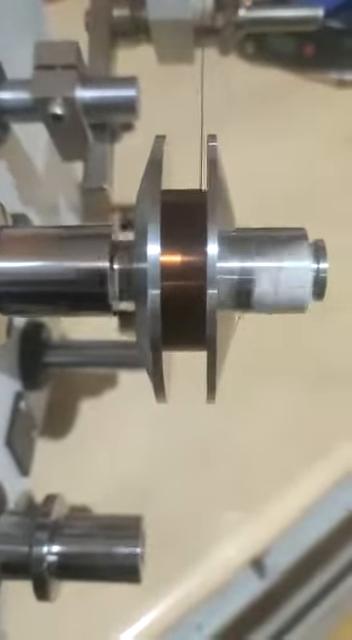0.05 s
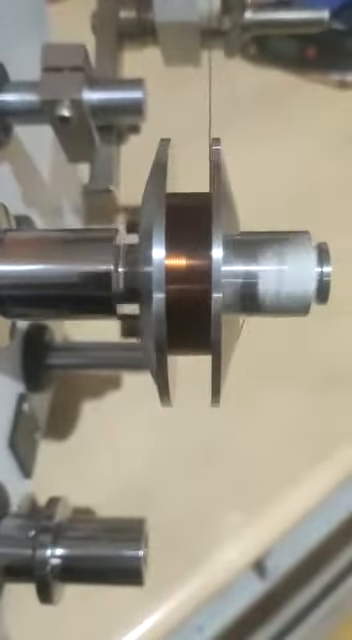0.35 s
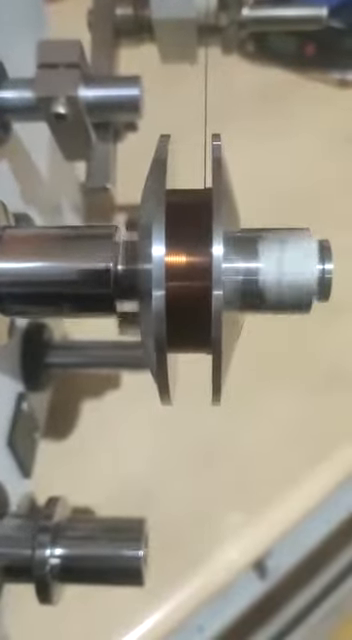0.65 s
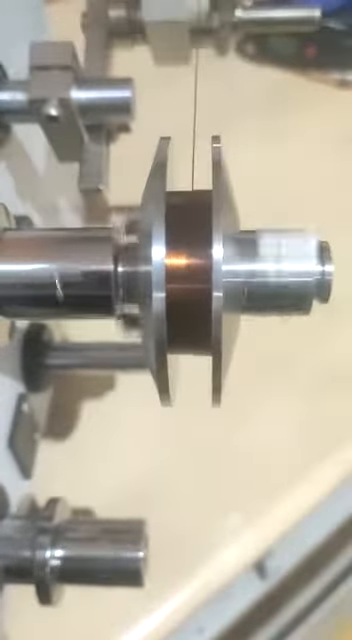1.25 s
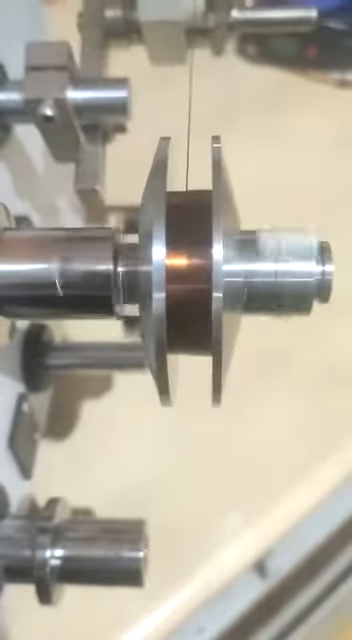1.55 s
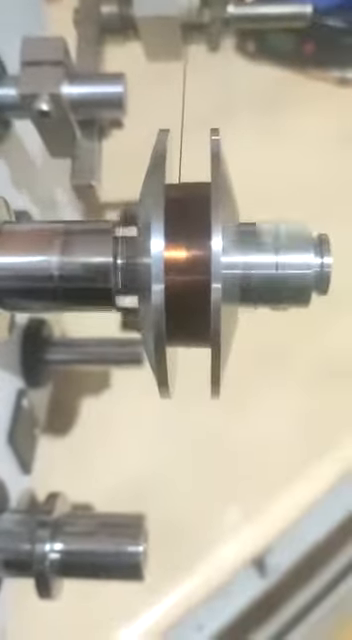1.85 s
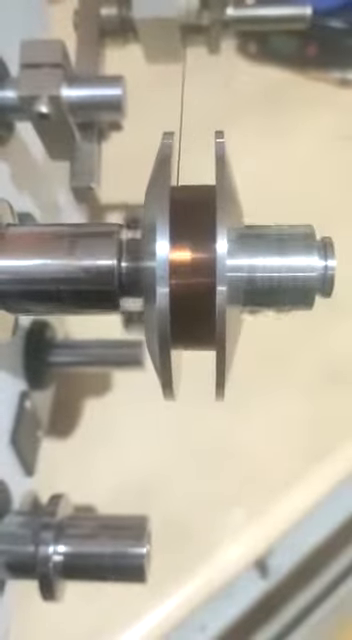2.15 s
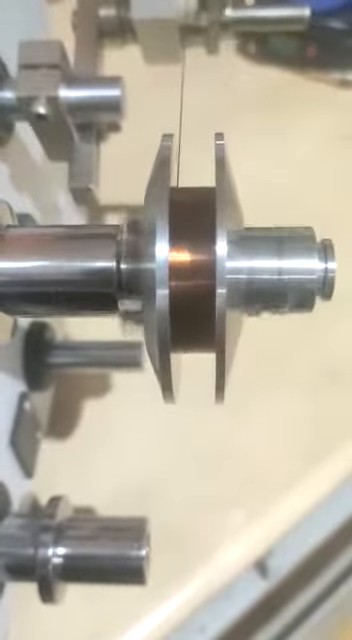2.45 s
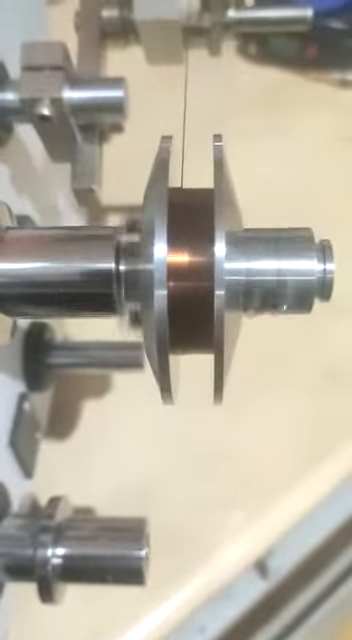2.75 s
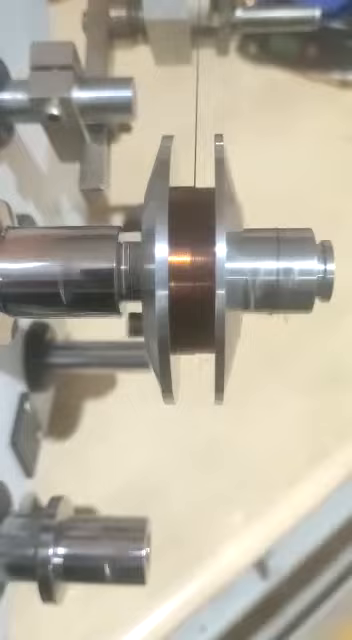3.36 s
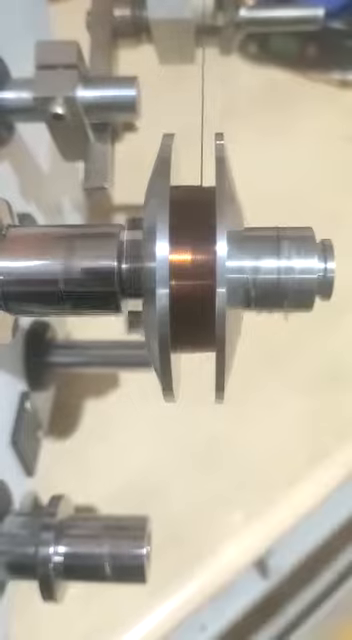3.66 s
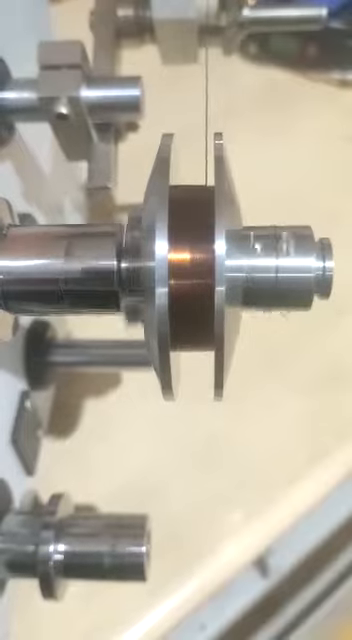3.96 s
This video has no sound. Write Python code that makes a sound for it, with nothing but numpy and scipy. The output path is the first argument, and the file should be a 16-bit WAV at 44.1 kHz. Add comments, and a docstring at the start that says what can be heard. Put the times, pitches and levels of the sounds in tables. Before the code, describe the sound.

A coil winding machine runs close by for the whole four seconds, its drive rattling with quick, uneven, lightly ringing knocks. A thin motor whine, low rumble, fine hiss and steady workshop rush go with it. At about 0.4 seconds the wire gives one tiny scrape. From around 1.2 to 2.8 seconds the whine slowly shifts in tone, while the speed stays almost constant.

```python
"""A coil winder runs close to the microphone, winding wire on a bobbin. From the start, play
(looseness) in the drive rattles and knocks the housing. The motor whines at multiples of its turning
rate, its power supply adds thin steady tones, the frame rumbles, and wire and motor hiss.
At about 0.4 s the wire scrapes once. From 1.2 s the whine slowly changes colour.
Near 3 s the motor speeds up a tiny bit, then settles a little slower."""
import sys
import numpy as np
from scipy import signal
from scipy.fft import rfft, irfft
from scipy.io import wavfile

SR = 44100
rng = np.random.default_rng(int(sys.argv[2]) if len(sys.argv) > 2 else 0)


def dump(signal):
    """Clip the signal to [-1, 1] and save it as 16-bit WAV at the path in sys.argv[1]."""
    limited = np.clip(np.atleast_2d(signal).T, -1, 1)
    pcm = np.round(limited * 32767).astype(np.int16)
    wavfile.write(sys.argv[1], SR, pcm)


N = 176400
T = np.arange(N) / SR
FREQ = np.maximum(np.arange(N // 2 + 1) * SR / N, 1)

# knocks of the drive (time [s], low ring [relative dB], bright ring [relative dB])
DRIVE_KNOCKS = [(0.157, -18.5, -35), (0.207, -32, -27), (0.287, -28, -61), (0.351, -25.5, -45),
                (0.421, -25, -29), (0.484, -21.5, -27), (0.546, -27, -44), (0.703, -26.5, -46),
                (0.764, -37, -31.5), (0.835, -24.5, -33), (0.892, -30, -27.5), (0.968, -27, -35),
                (1.025, -46, -40), (1.101, -27, -26.5), (1.15, -28, -53), (1.229, -26.5, -28.5),
                (1.289, -39, -26.5), (1.375, -22, -37), (1.425, -25, -30), (1.499, -34, -25),
                (1.554, -33, -29), (1.654, -27, -28), (1.747, -28.5, -31), (1.8, -39, -29),
                (1.866, -29.5, -30), (1.927, -28, -28), (2.06, -45, -28), (2.119, -30, -27),
                (2.18, -39, -29), (2.244, -23.5, -26.5), (2.304, -29, -29), (2.383, -24.5, -34),
                (2.435, -43, -27), (2.492, -23.5, -26.5), (2.549, -20, -34.5), (2.629, -22, -31),
                (2.737, -41, -26.5), (2.869, -45, -28.5), (2.935, -52, -30.5), (3.012, -34, -32),
                (3.066, -44, -28.5), (3.144, -25, -41), (3.228, -23.5, -41), (3.345, -22.5, -34),
                (3.393, -37, -25.5), (3.451, -37, -37), (3.522, -24.5, -31.5), (3.579, -29, -28),
                (3.639, -29, -37), (3.707, -40, -34), (3.77, -23.5, -26.5), (3.829, -41, -29),
                (3.891, -37, -29.5), (3.956, -31, -29)]
# notes the housing rings at
# (pitch [Hz], width [Hz], left [relative dB], right [relative dB], change in a hard knock [dB])
HOUSING_NOTES = [(660, 42.3, -8.5, -9.5, -9.5), (814, 34, -32, -16.5, -3), (887.2, 15.3, 5, -2, -3.5),
                 (912, 14.6, 2.5, 1.5, -2), (1018.5, 30, -2, -11.5, -6), (1024.4, 31.8, -3.5, 0.5, 0.5),
                 (1099.4, 18.7, -2, -2.5, 1), (1155, 13.4, -3.5, -3.5, 5.5), (1194.6, 70, -17.5, -15, 13.5),
                 (1267, 35, -29.5, -24, 17), (1346, 44, -21, -18.5, 8.5), (1528, 13.5, -35.5, -15.5, -6)]
# moments when the chatter dips briefly (time [s])
LULL_TIMES = [.265, 0.329, 0.403, 0.679, .94, 1.08, 1.342, 1.477, 2.8, 3.11]
# how fast the motor turns (time [s], speed [turns per s])
MOTOR_SPEED = [(1.9, 50.2), (2.88, 50.25), (2.97, 50.36), (3.14, 50.05)]
# tones of the whine (pitch [cycles per motor turn])
WHINE_MULTIPLES = (39, 54, 72, 90, 108, 139, 144, 146, 155, 162, 163, 167, 180, 191, 202, 214, 224, 227,
                   229, 230, 234, 238, 242)
# strength of each whine tone (early level [dB], late level [dB], left minus right [dB])
WHINE_LEVELS = [(-68, -69, -18), (-57, -50, 5), (-56, -60, -4.5), (-85, -73.5, 13), (-70.5, -69.5, 12.5),
                (-69, -66, 10), (-62.5, -64.5, -2), (-77, -75, -17), (-75, -73, -16), (-63, -58, -5),
                (-66.5, -65, -18), (-85, -79, -10), (-72, -67.5, -8), (-69.5, -70, -17), (-68, -63, -4),
                (-73, -67, -7), (-71, -71, 4), (-70, -71, 10), (-61, -60.5, -9), (-59, -65, -1),
                (-64, -63, -9), (-80, -78, -3), (-79, -67, 5)]
# mains hum and tones of the power supply (pitch [Hz])
SUPPLY_PITCHES = (100, 200, 2001, 3002, 4003, 8005, 10008)
# strength of each supply tone (level [dB], left minus right [dB])
SUPPLY_LEVELS = [(-55, 3), (-57.5, 1), (-78, -14), (-68, -7.5), (-62.5, -4), (-70, -18), (-74, 5)]
# notes the frame shakes at (pitch [Hz], width [Hz], level [relative dB])
FRAME_NOTES = [(26.3, 23, -10.5), (47.5, 21, -1), (71.3, 4.1, 1), (88.4, 8.8, -10), (128.9, 20.3, 1),
               (162, 33, -3), (192.3, 16.8, -2), (216, 28, -5), (242, 10.2, -5), (270.2, 11.3, -4.5),
               (302.4, 24, -9.5), (328, 11, -8.5)]
# bass swells, which rumble() scales down (time [s], deep bass [relative dB], bass [relative dB])
BASS_SWELLS = [(0.0, -47, -39.5), (0.09, -41, -43.5), (0.3, -46, -46.5), (0.47, -47, -41),
               (0.85, -54.5, -45.5), (1.7, -42, -42), (1.751, -31.5, -49), (1.94, -52, -43),
               (2.13, -55, -42), (2.25, -48, -47.5), (2.43, -50, -36.5), (2.5, -45, -43.5),
               (2.68, -51, -41), (2.901, -52, -42.5), (3.77, -41.5, -44.5), (3.82, -42, -41),
               (3.91, -44, -41.5), (4.0, -57, -40.5)]
# colour of the wire and motor hiss (frequency [Hz], level [relative dB])
HISS_COLOUR = [(1000, 10), (2000, 3), (2800, 0.5), (4200, 6.5), (6500, 1), (7100, 5.5), (8200, 5),
               (9200, 1), (9700, 7), (10500, 2.5), (11100, 10), (11450, 10), (11900, 10), (12200, 6),
               (12700, 1), (15000, -2.5), (16000, -14)]
# colour of the workshop air and bearing noise (frequency [Hz], level [relative dB])
AIR_COLOUR = [(15, 4), (28, 4), (100, -6.5), (250, -12), (370, -4), (450, -4), (560, -1.5), (750, 0),
              (950, 4.5), (1250, -8), (1450, -15.5), (2000, -16), (3000, -13.5), (5000, -27.5), (8000, -22),
              (16000, -45)]
# the microphone's two sides (frequency [Hz], left ahead by [radians], shared sound [0 to 1])
MIC_SIDES = [(30, 0.5, 1), (216, 0, 0.96), (320, 0, 0.82), (660, 0, 0.38), (1134, -1, 0.85),
             (1870, -2, 0.44), (2670, -2, 0.89), (4150, -2.5, 0.31), (8000, -1.5, 0.34),
             (11500, -1.34, 0.52), (16000, -1.5, .4)]

SPINDLE_HZ, THROB_DB, THROB_PEAK_S = 15.75, 0.2, 0.022
TAPS_PER_S, BOUNCES_PER_S, BOUNCE_FADE_S = 480, 380, 0.024
BRIGHT_ABOVE_HZ, CLACK_HZ, CLACK_WIDTH_HZ = 1065, 1106, 365
WHINE_CHANGE_S = (1.2, 2.83)  # from the early levels to the late ones
WOBBLES_PER_TURN, WOBBLE_BELOW_HZ, WOBBLE_DEPTH, WOBBLE_RADIANS = 0.6334, 3200, 0.34, 0.94


def chatter(lull_db=-8, lull_width_s=0.018):
    """All the noise of the loose drive: rattle and knocks with short lulls, plus dry clacks."""
    lulls = sum(np.exp(-((T - at) / lull_width_s) ** 2) for at in LULL_TIMES)
    return (rattle() + knocks()) * undb(lull_db * lulls) + clacks()


def rattle():
    """Loose parts tap the housing lightly, with a faint throb once a spindle turn."""
    taps = random_taps(TAPS_PER_S) * undb(rng.standard_normal(N))
    throb = undb(THROB_DB * np.cos(2 * np.pi * SPINDLE_HZ * (T - THROB_PEAK_S)))
    return level(housing(taps, np.array(HOUSING_NOTES), hardness=0) * throb, db=-37.5)


def knocks():
    """Loose parts hit, then bounce ever more weakly; each knock has its own low and bright ring."""
    times, low_db, bright_db = np.array(DRIVE_KNOCKS).T
    starts = (times * SR).astype(int)
    latest = np.maximum(np.searchsorted(starts, np.arange(N), side="right") - 1, 0)
    age = T - times[latest]  # seconds since the latest knock
    force = 0.5 * random_taps(BOUNCES_PER_S) * fade(age, BOUNCE_FADE_S)
    force[starts] = 0.9  # the first blow of each knock
    notes = np.array(HOUSING_NOTES)
    is_bright = notes[:, 0] > BRIGHT_ABOVE_HZ
    low = housing(force * undb(low_db[latest]), notes[~is_bright], hardness=0.75)
    bright = housing(force * undb(bright_db[latest]), notes[is_bright], hardness=1)
    return level(low, db=-40.5) + level(bright, db=-40.5)


def clacks():
    """Each knock also reaches the microphone directly, as a short dry clack."""
    times, _, bright_db = np.array(DRIVE_KNOCKS).T
    blows = np.zeros(N)
    blows[(times * SR).astype(int)] = undb(bright_db + 1)
    treble_cut = np.sqrt(1 + (FREQ / (CLACK_HZ + CLACK_WIDTH_HZ)) ** 20)
    response = ring(resonances([CLACK_HZ], [CLACK_WIDTH_HZ], [0]) / treble_cut)
    peak = abs(irfft(response, N)).max()
    return irfft(rfft(blows) * response * np.exp(1j * left_lead(FREQ)), N) / peak


def housing(force, notes, hardness):
    """The housing rings when it is hit; hard blows favour its higher notes."""
    hz, width, left_db, right_db, hard_db = notes.T
    response = [ring(resonances(hz, width, db + hardness * hard_db)) for db in (left_db, right_db)]
    scattered = force * rng.choice([-1, 1], (2, N))
    return microphone(force, scattered, np.array(response))


def whine():
    """The motor sings at multiples of its turning rate; the load makes the lowest tones wobble."""
    angle = 2 * np.pi * motor_turns()
    load = WOBBLES_PER_TURN * angle  # about twice a spindle turn
    out = 0
    for multiple, (early_db, late_db, pan_db) in zip(WHINE_MULTIPLES, WHINE_LEVELS):
        hz = multiple * MOTOR_SPEED[0][1]
        flicker_db = 1.98 * wander(rate_hz=10.7)
        gain = undb(np.interp(T, WHINE_CHANGE_S, [early_db, late_db]) + flicker_db)
        phase = multiple * angle
        rough_db, jitter = 2.7 * wander(rate_hz=90), 0.35 * wander(rate_hz=200)
        if hz < WOBBLE_BELOW_HZ:
            gain *= undb(rough_db) * (1 + WOBBLE_DEPTH * np.cos(load))
            phase += WOBBLE_RADIANS * np.sin(load) + jitter
        out += gain * tone(phase, hz, pan_db)
    return out


def motor_turns():
    """Add up the motor's speed to count its turns so far."""
    times, speed = np.array(MOTOR_SPEED).T
    return np.cumsum(np.interp(T, times, speed)) / SR


def power_supply():
    """The electricity adds a low hum and thin, steady tones."""
    return sum(undb(db) * tone(2 * np.pi * hz * T, hz, pan_db)
               for hz, (db, pan_db) in zip(SUPPLY_PITCHES, SUPPLY_LEVELS))


def rumble(deep_below_hz=93):
    """The frame shakes; its deep bass and its bass swell and sink separately."""
    times, deep_db, bass_db = np.array(BASS_SWELLS).T
    colour = resonances(*np.array(FRAME_NOTES).T)
    deep_share = 1 / (1 + (FREQ / deep_below_hz) ** 8)
    out = 0
    for share, db, depth in ((deep_share, deep_db, 0.6), (1 - deep_share, bass_db, 0.81)):
        swell = undb(depth * np.interp(T, times, db - db.mean()))
        out += noise(colour * np.sqrt(share)) * swell
    return level(out, db=-40.5)


def wire_scrape(at_s=0.428, fade_s=0.0067):
    """The wire scrapes once: a tiny burst of bright noise."""
    return fade(T - at_s, fade_s) * level(noise(np.sqrt(FREQ / SR)), db=-34)


def hiss(pulse_db=3, pulse_turns=0.12):
    """Wire and motor give a fine hiss that pulses once a motor turn."""
    pulse = undb(pulse_db * np.exp(-(motor_turns() % 1) / pulse_turns))
    steady = noise(undb(curve(HISS_COLOUR, FREQ)))
    return pan(db=-2) * level(steady * pulse, db=-47.5)


def workshop_air():
    """The bearings and the workshop make a steady rush behind everything."""
    return pan(db=0.5) * level(noise(undb(curve(AIR_COLOUR, FREQ))), db=-39)


def microphone(shared, separate, response):
    """Filter a sound into stereo: one part reaches both sides, the rest differs on each."""
    share = curve(MIC_SIDES, FREQ, column=2)
    direct = rfft(shared) * np.exp(1j * left_lead(FREQ)) * np.sqrt(share)
    scattered = rfft(separate) * np.sqrt(1 - share)
    return irfft((direct + scattered) * response, N)


def left_lead(hz):
    """Left and right phase shifts in radians; only the left wave is moved."""
    return curve(MIC_SIDES, hz) * np.array([[1], [0]])


def noise(colour):
    """Stereo noise with this gain at each frequency."""
    return microphone(rng.standard_normal(N), rng.standard_normal((2, N)), colour)


def tone(phase, hz, pan_db):
    """A pure tone in stereo."""
    return np.sqrt(2) * pan(pan_db) * np.sin(phase + left_lead(hz))


def resonances(pitches, widths, levels):
    """A gain curve with a steep peak at each note an object rings at."""
    peaks = (undb(db) / (1 + (2 * (FREQ - hz) / width) ** 2)
             for hz, width, db in zip(pitches, widths, levels))
    return np.sqrt(sum(peak ** 2 for peak in peaks))


def ring(gain):
    """Turn a gain curve into a filter that rings after a blow, never before it."""
    cepstrum = irfft(np.log(gain + 1e-5), N)  # the log of the curve, laid out in time
    cepstrum[1:N // 2] *= 2
    cepstrum[N // 2 + 1:] = 0
    return np.exp(rfft(cepstrum))


def random_taps(per_s):
    """Tiny pushes and pulls at random moments."""
    return (rng.random(N) < per_s / SR) * rng.choice([-1, 1], N)


def wander(rate_hz):
    """A smooth random wiggle, about 1 in size."""
    wiggle = irfft(rfft(rng.standard_normal(N)) * np.exp(-(FREQ / rate_hz) ** 2), N)
    return level(wiggle - wiggle.mean(), db=0)


def fade(age, fade_s):
    """Silent until age 0, then a jump to 1 that dies away."""
    return (age > 0) * np.exp(-abs(age) / fade_s)


def curve(table, hz, column=1):
    """Read between a table's rows, giving each octave equal room."""
    table = np.array(table)
    return np.interp(np.log(hz), np.log(table[:, 0]), table[:, column])


def pan(db):
    """Left and right gains that make the left louder by db."""
    return undb(np.array([[db], [-db]]) / 2)


def level(x, db):
    """Set a sound's average (rms) level."""
    return x * undb(db) / np.sqrt(np.mean(x ** 2))


def undb(db):
    """Turn decibels into a gain to multiply by."""
    return 10 ** (np.asarray(db) / 20)


def scene():
    """The whole machine in its workshop."""
    return chatter() + whine() + power_supply() + rumble() + workshop_air() + wire_scrape() + hiss()


def record(dry, top_hz=15750):
    """Cut away the very highest treble."""
    return signal.sosfilt(signal.ellip(12, 0.1, 80, top_hz, fs=SR, output="sos"), dry)


dry = scene()
out = record(dry)
dump(out)
```